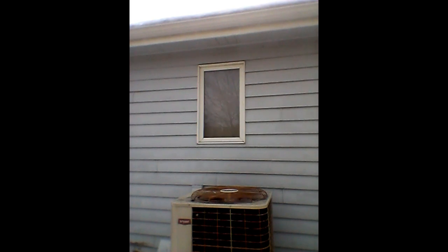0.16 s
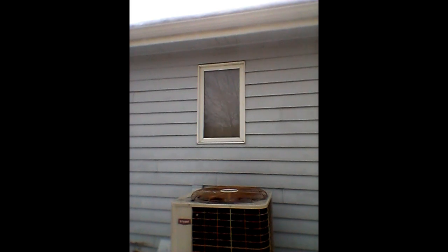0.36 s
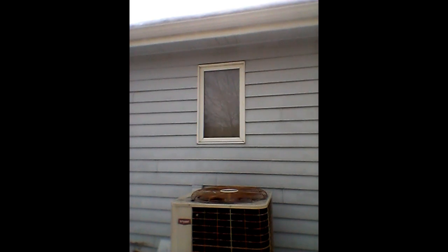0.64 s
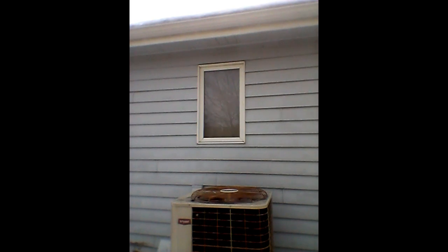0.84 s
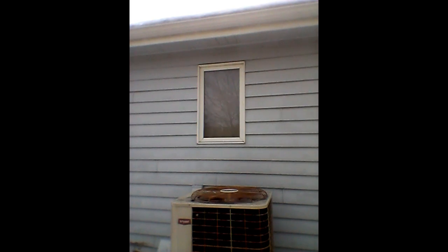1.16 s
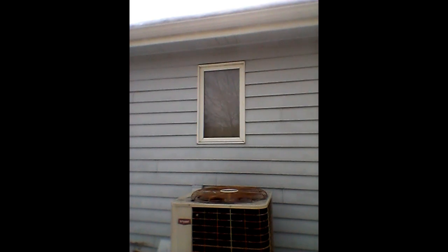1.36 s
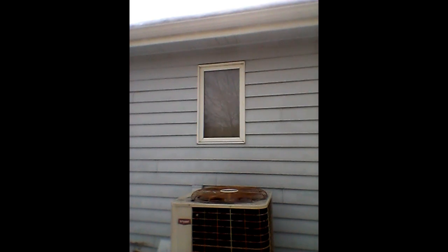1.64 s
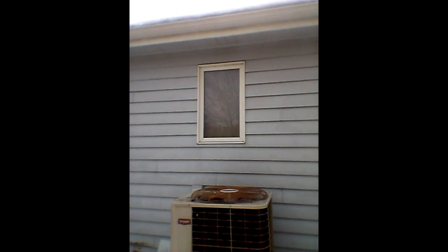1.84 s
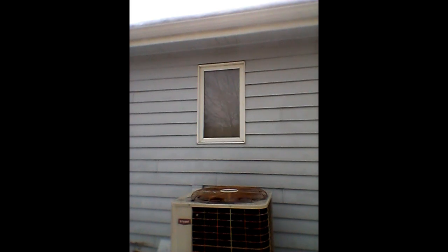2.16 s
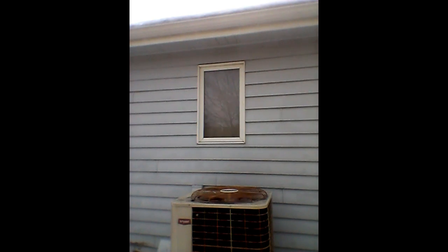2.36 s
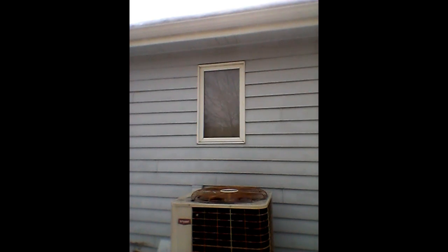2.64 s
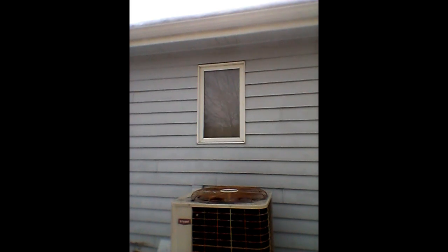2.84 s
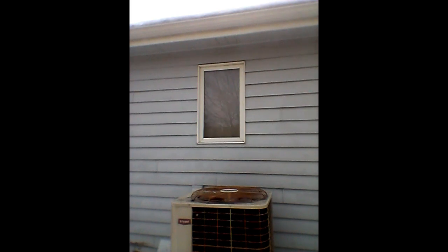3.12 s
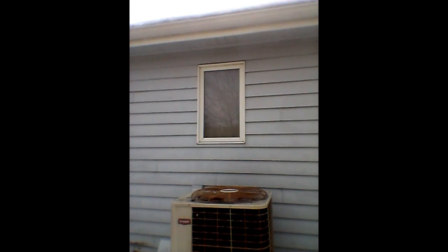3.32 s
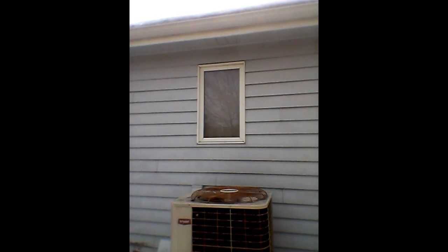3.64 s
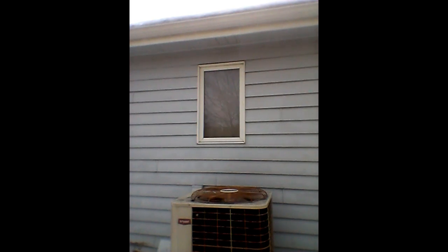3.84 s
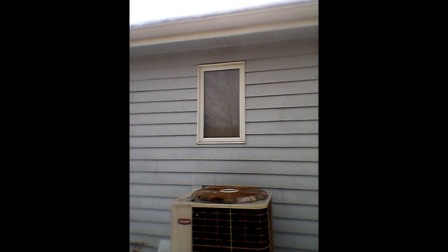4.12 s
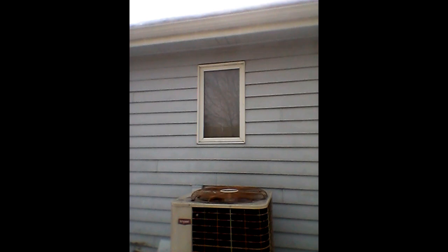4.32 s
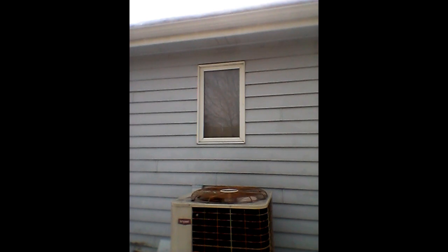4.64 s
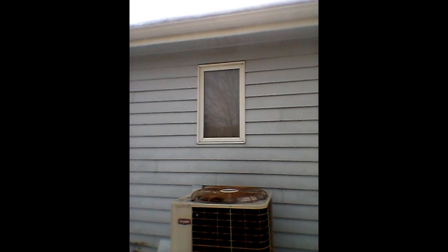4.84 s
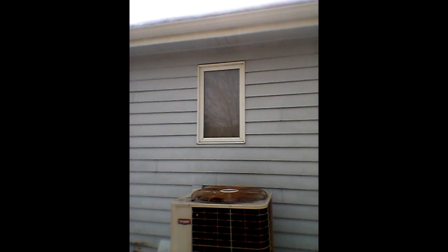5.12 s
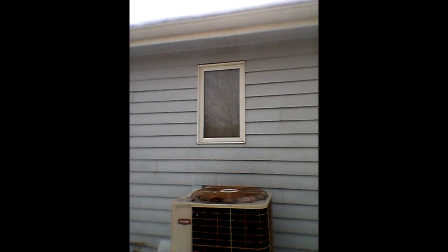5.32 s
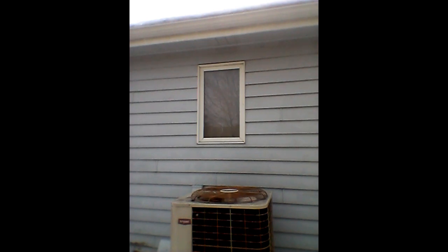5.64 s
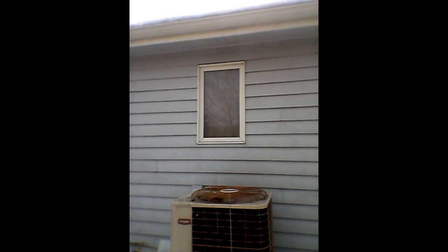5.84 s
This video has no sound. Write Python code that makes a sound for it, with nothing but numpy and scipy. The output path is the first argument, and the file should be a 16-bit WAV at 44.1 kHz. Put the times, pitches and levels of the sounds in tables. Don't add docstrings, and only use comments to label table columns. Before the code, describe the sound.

A quiet yard with faint rustle, dry ticks and bird notes, then a loud clank, fan hum and harsh compressor knocking that softens.

```python
import sys
import numpy as np
from scipy import signal
from scipy.fft import rfft, irfft, next_fast_len
from scipy.io import wavfile
from scipy.ndimage import uniform_filter1d, map_coordinates

SR = 44100
rng = np.random.default_rng(int(sys.argv[2]) if len(sys.argv) > 2 else 0)


def wrap_up_sound(samples):
    columns = np.atleast_2d(samples).T
    tamed = np.clip(columns, -1, 1)
    steps = np.round(tamed * 32767).astype(np.int16)
    wavfile.write(sys.argv[1], SR, steps)


def attenuation_scalar(level_db):
    decades = np.asarray(level_db, float) / 20
    return 10 ** decades


N = 263277
SHAFT_HZ, KNOCK_S = 59.43, 4.4102
FAN_ON_S, COMPRESSOR_ON_S = 3.44, 4.06


def evened(x):
    return x / np.sqrt(np.mean(x ** 2) + 1e-20)


def since(s):
    return np.maximum(np.arange(N) / SR - s, 0)


def read(points, hz):
    f, value = np.transpose(points)
    return np.interp(np.log(hz + 1), np.log(f + 1), value)


def curves(rows):
    s, *columns = np.transpose(rows)
    return [np.interp(np.arange(N) / SR, s, c) for c in columns]


def drift(hz):
    return evened(signal.sosfilt(signal.butter(2, hz, fs=SR, output="sos"), rng.standard_normal(N)))


def coloured(x, db_at):
    size = next_fast_len(len(x))
    gain = attenuation_scalar(db_at(np.fft.rfftfreq(size, 1 / SR)))
    return irfft(rfft(x, size) * gain, size)[:len(x)]


def ring(x, modes):
    out = np.zeros(len(x))
    for k, (hz, width_hz, db) in enumerate(modes):
        r, w = np.exp(-np.pi * width_hz / SR), 2 * np.pi * hz / SR
        gain = (-1) ** k * attenuation_scalar(db) * (1 - r) * np.sin(w)
        out += gain * signal.lfilter([1], [1, -2 * r * np.cos(w), r * r], x)
    return out


def add(mix, s, sound):
    part = mix[round(s * SR):][:len(sound)]
    part += sound[:len(part)]


def pair(own, alike_below_hz):
    shared, left, right = rng.standard_normal((3, N))
    b, a = signal.butter(1, alike_below_hz, fs=SR)
    low = signal.lfilter(b, a, [shared, np.roll(shared, 7)])
    mine = np.array([left, right])
    return low + own * mine + (1 - own) * (mine - signal.lfilter(b, a, mine))


def ports(x, scatter_db):
    t = np.arange(1800) / SR
    taps = rng.standard_normal((2, len(t))) * np.exp(-t / 0.0045) * (rng.random((2, len(t))) < .3)
    taps = signal.sosfilt(signal.butter(2, 2500, "high", fs=SR, output="sos"), taps)
    taps *= attenuation_scalar(scatter_db) / np.linalg.norm(taps, axis=1, keepdims=True)
    taps[0, 0] += 1
    taps[1, 10] += 1
    return signal.oaconvolve(x[None], taps, axes=1)[:, :N]


# start_s, rustle_db
BREEZE_CURVE = [(0, -59.5), (.11, -59), (.3, -65), (.54, -56.5), (.72, -61), (.9, -64), (1.1, -62.5),
                (1.65, -68.5), (1.85, -65), (2.2, -63.5), (2.3, -60.5), (2.7, -66), (2.76, -61.5),
                (2.95, -60.5), (3.19, -71.5), (3.42, -59.5)]


def breeze():
    calm_db, stir_db, stir_s = -63, -11, 0.035
    level_db, = curves(BREEZE_CURVE)
    stir = sum(attenuation_scalar(db + stir_db) * (since(s) > 0) * np.exp(-since(s) / stir_s) for s, db, *_ in DRY_TICKS)
    rumble = attenuation_scalar(-62.5 + 0.33 * (level_db - calm_db) + 1.4 * drift(6.9))
    return rumble, attenuation_scalar(level_db + 4.0) + stir


# freq_hz, density_db_per_hz
YARD_SPECTRUM = [(18, -45), (30, 1.5), (87, -4.5), (404, -12), (953, -4), (1440, -10), (1690, -10.5),
                 (2310, -12.5), (2920, -6.5), (3680, -14), (4780, -10), (8470, -28), (11300, -25.5),
                 (13900, -28), (15000, -40)]
# pitch_hz, level_db_rms
WHINES_STEADY = [(839.8, -80), (952.8, -74.5), (1658, -77), (1814, -80), (2998, -92), (3386, -83),
                 (4657, -91), (11278, -88)]


def whines(near):
    t, out = np.arange(N) / SR, np.zeros(N)
    for hz, db in WHINES_STEADY:
        follow = near / attenuation_scalar(-57.5) if 1000 < hz < 5000 else 1
        phase = 2 * np.pi * hz * t + (.5 + hz / 3000) * drift(18)
        out += follow * attenuation_scalar(db + 5.0 + 2.2 * drift(9.4)) * np.sin(phase)
    return out


def yard():
    hiss_db, hiss_above_hz = -75, 6700
    far, near = breeze()
    crackle = attenuation_scalar(1.8 * np.minimum(rng.exponential(1, N), 4)) * (rng.random(N) < 300 / SR)
    crackle = signal.oaconvolve(crackle, np.exp(-np.arange(600) / 48.0))[:N]
    grain = (1 + 0.2 * evened(crackle)) * attenuation_scalar(1.75 * drift(34))
    tones = whines(near)

    def rumble_db(f):
        return read(YARD_SPECTRUM, f) - 60 * (f > 500)

    def rustle_db(f):
        return read(YARD_SPECTRUM, f) - 60 * (f <= 500) - 6.0 * (f > hiss_above_hz)

    def top_db(f):
        return read(YARD_SPECTRUM, f) - 60 * (f <= hiss_above_hz)

    out = []
    for noise in pair(0.54, 2500):
        rumble = evened(coloured(noise, rumble_db))
        rustle = evened(coloured(noise * grain, rustle_db))
        hiss = evened(coloured(noise, top_db))
        out.append(far * rumble + near * rustle + attenuation_scalar(hiss_db) * hiss + tones)
    return np.array(out)


# freq_hz, width_hz, level_db
PATTER_MODES = [(4500, 440, -1.5), (5060, 480, 1)]


def patter():
    per_s, length_s, spread_db = 27, .007, 3
    gaps_s = rng.uniform(.4, 1.6, round(N / SR * per_s / 2 + 10)) / per_s
    at = np.cumsum(gaps_s * SR).astype(int)
    clicks, t = np.zeros(N), np.arange(1500) / SR
    clicks[at] = attenuation_scalar(spread_db * rng.standard_normal(len(at)))
    bursts = signal.oaconvolve(clicks, t / length_s * np.exp(-(t / length_s) ** 1.5))[:N]
    rung = ring(ring(bursts * rng.standard_normal(N), PATTER_MODES), [(4800, 1800, 0)])
    return attenuation_scalar(-4 - 1.8 * since(0) + curves(BREEZE_CURVE)[0]) * evened(rung)


# start_s, peak_db, pitch_hz, low_knock_rel_db
DRY_TICKS = [(0.0892, -49, 4800, 4), (0.1605, -53.5, 5300, 2), (0.2262, -58, 4540, -8),
             (0.3593, -56.5, 5570, 9), (0.39, -60, 3140, 1), (0.508, -43.5, 4470, -7),
             (0.729, -60.5, 4060, 8), (0.97, -51, 4370, 5.5), (1.092, -48.5, 4540, 5),
             (1.1744, -51.5, 4600, 5), (1.2476, -54, 4600, 0), (1.3269, -55, 5700, -8),
             (1.3656, -57.5, 3370, 13.5), (1.4344, -58, 4600, 7), (1.508, -56.5, 4600, -20),
             (1.5327, -44, 4320, -20), (1.6909, -44.5, 4590, 0.5), (1.8092, -51, 3400, -5),
             (2.0254, -56, 4400, -1), (2.1829, -55, 4070, -14), (2.2752, -53.5, 4050, 9),
             (2.59, -55, 4540, -1), (2.7397, -54, 4070, -8), (2.7741, -55, 4750, -7),
             (2.8539, -51.5, 5300, -11), (2.9335, -62, 4550, -1), (2.972, -55.5, 4730, -3),
             (3.265, -59, 4570, -1), (3.3428, -78, 4700, -9), (3.3762, -61, 4750, -7)]


def ticks():
    out, t = np.zeros(N), np.arange(2600) / SR
    shape = (np.exp(-t / .004) + .4 * np.exp(-t / .025)) * np.minimum(t / .002, 1)
    for s, db, hz, low_db in DRY_TICKS:
        high, low = rng.standard_normal((2, len(t)))
        bright = evened(ring(high, [(hz, 900, 0), (5000, 1200, -3.0), (7500, 3000, -18.0)]))
        dull = evened(ring(low, [(970, 210, -0.084), (1740, 460, 0.92), (2830, 100, -0.5)]))
        add(out, s, attenuation_scalar(db - 2.5) * shape * (bright + attenuation_scalar(low_db) * dull))
    return out


# start_s, length_s, from_hz, to_hz, level_db
BIRD_NOTES = [
    (.04, .14, 1900, 3470, -61),
    (.345, .135, 1850, 3480, -61.5),
    (1.0, .09, 4450, 3750, -67),
    (2.63, .07, 2100, 2080, -67),
]


def birds():
    glide_s, glide_bend, waver_hz = .05, 2.2, 35
    out = np.zeros(N)
    for s, length_s, from_hz, to_hz, db in BIRD_NOTES:
        t = np.arange(0, length_s, 1 / SR)
        glide = np.exp(-(t / glide_s) ** glide_bend)
        hz = to_hz + (from_hz - to_hz) * glide + waver_hz * drift(110)[:len(t)]
        note = np.sin(2 * np.pi * np.cumsum(hz) / SR) * signal.windows.tukey(len(t), .6)
        add(out, s, attenuation_scalar(db) * note)
    return out * attenuation_scalar(3 * drift(60))


# start_s, peak_db, low_body_rel_db, t60_s
PANEL_BLOWS = [(3.4405, -7.5, -24, 0.14), (3.5004, -30, -2, 0.069), (3.5446, -19.5, -5, 0.06),
               (3.6644, -25, -17, 0.071), (3.7242, -25, -18, 0.06), (3.8304, -29, -29, 0.042),
               (3.915, -23, 13, 0.053), (3.9763, -31, -9, 0.055), (4.006, -13.5, 6, 0.022),
               (4.0231, -12, 9, 0.028), (4.058, -15.5, -3, 0.049)]
# freq_hz, density_db_per_hz
CLANK_SPECTRUM = [(150, -34), (330, -17.5), (420, -14.5), (750, -19), (984, -1), (1800, -9), (2400, -18.5),
                  (3200, -18.5), (4200, -7), (5200, -14), (6210, -16.5), (9000, -30), (13800, -30.5),
                  (15500, -45)]


def blows():
    out, t = np.zeros(N), np.arange(SR // 3) / SR
    for s, db, low_db, t60_s in PANEL_BLOWS:
        rough = evened(uniform_filter1d(rng.standard_normal(len(t)), size=60))
        noise = rng.standard_normal(len(t)) * attenuation_scalar(2.0 * rough)

        def clank_db(f):
            body = np.exp(-(np.log((f + 1) / 950) / 0.69) ** 2)
            return read(CLANK_SPECTRUM, f) + (low_db + 12.5) * body

        decay = attenuation_scalar(-60 * t / max(t60_s, .02)) + attenuation_scalar(-18 - 60 * t / .5)
        shape = decay * np.minimum(t / (.05 * t60_s), 1)
        add(out, s, attenuation_scalar(db - 9) * shape * evened(coloured(noise, clank_db)))
    return out


# start_s, strength_0_1, beat_turns
HUM_BEATS = [
    (3.6, 0, .3),
    (4.24, 1, .985),
    (4.35, 1, 1.015),
    (5.07, .75, 2),
    (5.47, .7, 3),
    (6.1, .5, 4),
]
# start_s, hold_s, level_db, fade_db_per_s
THIRD_BOOMS = [
    (3.897, .08, -34.5, -4),
    (4.065, .39, -26, -24),
]


def hum():
    boom_edge_s = .05
    t, on = np.arange(N) / SR, since(FAN_ON_S)
    s, share, turns = np.transpose(HUM_BEATS)
    strength = np.interp(t, s, share) * np.minimum(since(COMPRESSOR_ON_S - .05) / 0.26, 1)
    beat = strength * np.exp(-2j * np.pi * np.interp(t, s, turns))
    level = attenuation_scalar(-46 + 21.5 * np.exp(-on / 0.45) + 2 * on) * np.minimum(on / 0.16, 1) ** 2
    mains = level * ((1 - beat) * np.exp(2j * np.pi * 119.9 * t + .1j * drift(1.7))).imag
    third = attenuation_scalar(-42 + 1.5 * drift(2.8))
    for s, hold_s, db, fade_db in THIRD_BOOMS:
        edges_s = np.minimum(t - s, s + hold_s + boom_edge_s - t)
        third = third + attenuation_scalar(db + fade_db * since(s)) * np.clip(edges_s / boom_edge_s, 0, 1)
    return mains + attenuation_scalar(-4.0) * third * np.sin(2 * np.pi * 3 * SHAFT_HZ * t + .5 * drift(1.2))


# freq_hz, density_db_per_hz
AIR_SPECTRUM = [(30, -25.5), (65, -16.5), (119, -16.5), (167, -18), (364, -10.5), (472, -12), (953, -14.5),
                (1500, -20), (2250, -29), (3150, -23), (4420, -25), (8470, -43), (11600, -44), (14600, -52)]


def fan():
    t = np.arange(N) / SR
    shake_db = 8 * np.exp(-since(FAN_ON_S) / 0.23)
    loaded = np.minimum(since(COMPRESSOR_ON_S) / .1, 1)
    top_rise = np.minimum(since(4.85) / 0.12, 1)
    level_db = -38.5 + shake_db + 1.0 * drift(1)
    bright_db = -4 + .5 * shake_db - 1.5 * loaded
    duck_db = -22 * loaded * np.exp(-since(COMPRESSOR_ON_S + 0.37) / 0.52)
    buffet_db = -53.5 + duck_db + 0.83 * drift(4)
    top_db = -74 + 0.5 * shake_db + 12.5 * top_rise
    gust = attenuation_scalar(0.37 * drift(33))
    throb = 1 + 0.092 * np.cos(2 * np.pi * SHAFT_HZ * (t - KNOCK_S - .004))
    gains = attenuation_scalar(buffet_db), attenuation_scalar(level_db), attenuation_scalar(level_db + bright_db + 1.0) * throb, attenuation_scalar(top_db + 10.5)
    edges_hz = (0, 100, 2000, 9300, SR)
    air = np.zeros((2, N))
    for port, noise in zip(air, pair(0.12, 2330)):
        for gain, lo, hi in zip(gains, edges_hz, edges_hz[1:]):
            band = coloured(noise * gust, lambda f: read(AIR_SPECTRUM, f) - 70 * ((f < lo) | (f >= hi)))
            port += gain * evened(band)
    return (air + hum()) * np.clip(since(FAN_ON_S + 0.003) / 0.017, 0, 1)


def knocks(turns, orders, gains, spread, lag, chirp):
    size, count = 4096, 20
    climb, climb_steps = .015, 2
    common, left, right = rng.standard_normal((3, 1, len(orders)))
    swing_db, slip = rng.standard_normal((2, count, len(orders)))
    at, moment = turns % 1 * size, np.linspace(0, count - 1, len(turns))
    centre = np.average(orders, weights=gains ** 2)
    stretch = 1 + climb * np.exp(-np.arange(count) / climb_steps)
    gains = np.array([np.interp(orders * c, orders, gains) for c in stretch])
    scatter = (spread + .04 * abs(orders - centre)) * common + .22 * slip
    out = []
    for own, late in ((left, 0), (right, lag * SHAFT_HZ / SR)):
        lines = np.zeros((count, size // 2 + 1), complex)
        phase = scatter + chirp * (orders - centre) ** 2 + 0.3 * own - 2 * np.pi * orders * late
        lines[:, orders] = gains * attenuation_scalar(1.77 * swing_db) * np.exp(1j * phase)
        cycle = irfft(lines, size)
        out.append(map_coordinates(np.c_[cycle, cycle[:, :1]], [moment, at], order=1))
    return evened(np.array(out))


def rattle(turns, noise, modes):
    burst = .2 + np.exp(2.5 * (np.cos(2 * np.pi * (turns - .04)) - 1))
    broad = [(f, max(w, 260), d) for f, w, d in modes]
    return evened(np.array([ring(c * burst, broad) for c in noise]))


def mode_gains(orders, modes):
    power = 0
    for f, w, d in modes:
        power = power + attenuation_scalar(2 * d) / (1 + (2 * (orders * SHAFT_HZ - f) / w) ** 2) ** 1.38
    return np.sqrt(power)


# shaft_multiple, level_db
CASING_ORDERS = [(4, -13.5), (5, -14), (6, -15.5), (7, -13), (8, -17), (9, -12), (10, -15.5), (11, -19),
                 (12, -8.5), (13, -9.5), (14, -26), (15, -8.5), (16, -2.5), (17, 1.5), (18, -1.5),
                 (19, -16), (20, -7.5), (21, 1), (22, -11), (23, -2.5), (24, -13), (25, -11.5), (26, -14),
                 (27, -31), (28, -50), (29, -11), (30, -27), (31, -12), (32, -16.5)]
# start_s, level_db
KNOCK_CURVE = [
    (4.06, -3),
    (4.11, -5.5),
    (4.2, 1),
    (4.5, 1),
    (4.78, -1),
    (4.95, -6.5),
    (5.15, -11.5),
    (5.45, -18.5),
    (5.97, -24.5),
]
# freq_hz, width_hz, level_db
CABINET_MODES = [(740, 150, -15), (1010, 220, -11), (1240, 250, 0), (1780, 840, -6)]
PIPE_MODES = [(2080, 310, -10), (2380, 28, -5.5), (2547, 32, 2), (3050, 140, -4), (3170, 67, -19),
              (3450, 250, -7.5), (3850, 140, -6.5)]
SHELL_MODES = [(4267, 133, -4.5), (4277, 45, -2.5), (4590, 77, -5), (4754, 35, -2.5), (5046, 53, -7.5),
               (5400, 290, -15), (5850, 640, -14.5), (7390, 330, -22), (8450, 320, -28),
               (10020, 200, -35.5), (10570, 200, -30)]
# full_db, knock_share, sag_db_per_s
PART_LEVELS = [
    (-21, 0.82, -0.5),
    (-30, 0.66, -2.5),
    (-24, 1.39, -1.5),
    (-33.5, 0.085, -2),
]
# freq_hz, density_db_per_hz
GAS_SPECTRUM = [(290, -15), (500, -17.5), (631, -9), (992, -0.5), (1110, -39), (1220, -4.5), (2120, -15.5),
                (4250, -8), (4690, -13.5), (5430, -6.5), (6440, -13.5), (7460, -16.5), (9300, -23),
                (12100, -72), (20500, -120)]
# freq_hz, width_hz, level_db
VALVE_MODES = [(5450, 160, 6), (5050, 300, -22)]


def compressor():
    first = 4 * SR
    t = np.arange(first, N) / SR
    run_up = .05 * np.exp(-(t - 4.07) / .06)
    turns = SHAFT_HZ * (t - KNOCK_S) + run_up
    knock_db = curves(KNOCK_CURVE)[0]
    *levels, gas = [attenuation_scalar(db + share * knock_db + sag_db * since(COMPRESSOR_ON_S))[first:]
                    for db, share, sag_db in PART_LEVELS]
    k, db = np.transpose(CASING_ORDERS)
    k, low = np.round(k).astype(int), np.round(k) < 11
    casing = knocks(turns, k[low], attenuation_scalar(db[low]), 2.54, 8.1, 0)
    out = attenuation_scalar(-36.0) * (levels[0] / levels[0].max()) ** 0.26 * casing
    noise = np.array(pair(0.15, 1900))[:, first:]
    # modes, first and end order, boost_db, rattle share, late_turns, spread_rad, lag_samples, chirp_rad
    bodies = [(CABINET_MODES, 11, 33, -.7, .15, 0, .2, 4.5, -.035),
              (PIPE_MODES, 33, 67, 5.0, .28, .06, .35, 10.5, .005),
              (SHELL_MODES, 67, 182, 4.0, .28, .08, .25, 10.0, .006)]
    for level, (modes, start, end, boost_db, rough, late, spread, lag, chirp) in zip(levels, bodies):
        orders = np.arange(start, end)
        gains = attenuation_scalar(db[~low]) if modes is CABINET_MODES else mode_gains(orders, modes)
        clean = knocks(turns - late, orders, gains, spread, lag, chirp)
        body = evened(clean + rough * rattle(turns - late, noise, modes))
        out += level * attenuation_scalar(boost_db + 0.5 * drift(37)[first:]) * body
    throb = 1 + 0.1 * np.cos(2 * np.pi * (turns - .1))
    flow = noise[:, ::-1]
    hiss = evened(np.array([coloured(c, lambda f: read(GAS_SPECTRUM, f)) for c in flow]))
    whistle = evened(np.array([ring(c, VALVE_MODES) for c in flow]))
    out += attenuation_scalar(4.0) * gas * throb * hiss
    out += attenuation_scalar(-49 + 3.9 * drift(14)[first:]) * throb * whistle
    out = signal.sosfilt(signal.butter(7, 10900, fs=SR, output="sos"), out)
    onset = np.clip((t - KNOCK_CURVE[0][0] - .008) / 0.0027, 0, 1)
    return np.pad(out * onset, ((0, 0), (first, 0)))


def scene():
    small, clatter = ports(ticks() + patter(), -3.5), ports(blows(), 3.4)
    return yard() + small + birds() + fan() + clatter + compressor()


def roll_off(x):
    return signal.sosfilt(signal.butter(12, 15610, fs=SR, output="sos"), x)


# freq_hz, left_minus_right_db
PORT_BALANCE = [(60, -2), (110, 2), (200, -1.5), (380, 0.5), (700, -0.5), (1290, -2), (2380, -4.5),
                (4400, 4), (8120, -6), (15000, 4)]


def record(dry):
    tilted = np.array([coloured(c, lambda f: side * read(PORT_BALANCE, f) / 2 - 35.0 * (f < 42))
                       for c, side in zip(dry, (1, -1))])
    tilted = .85 * np.tanh(tilted / .85)
    hz, _, z = signal.stft(tilted, SR, nperseg=2048)
    power = uniform_filter1d(abs(z) ** 2, size=3, axis=2)
    bands = power[:, :1024].reshape(2, 128, 8, -1).mean(2).repeat(8, axis=1)
    whim = evened(uniform_filter1d(rng.standard_normal((128, z.shape[2])), size=3)).repeat(8, axis=0)
    band_hz = hz[:1024, None]
    margin_db = 23.3 + 4.5 * whim - 5 * (band_hz > 12400)
    weak = bands < power[:, :420].mean(1, keepdims=True) / attenuation_scalar(2 * margin_db)
    z[:, :1024][weak & (band_hz > 9000)] = 0
    z[:, hz > 14650] = 0
    mix = signal.istft(z, SR, nperseg=2048)[1][:, :N]
    return roll_off(mix)


dry = scene()
out = record(dry)
wrap_up_sound(out)
```